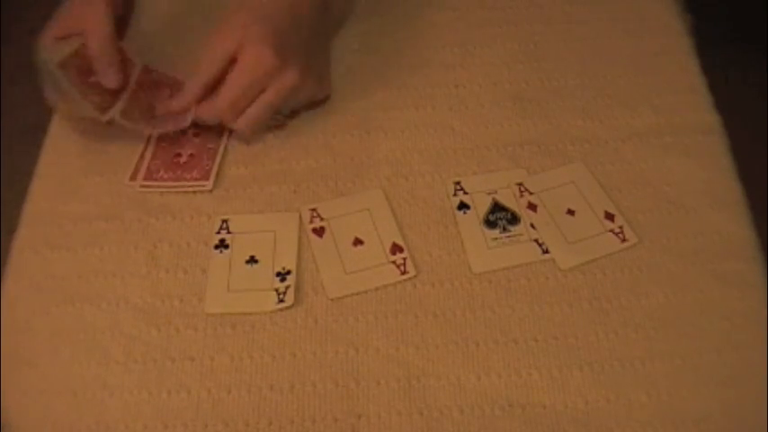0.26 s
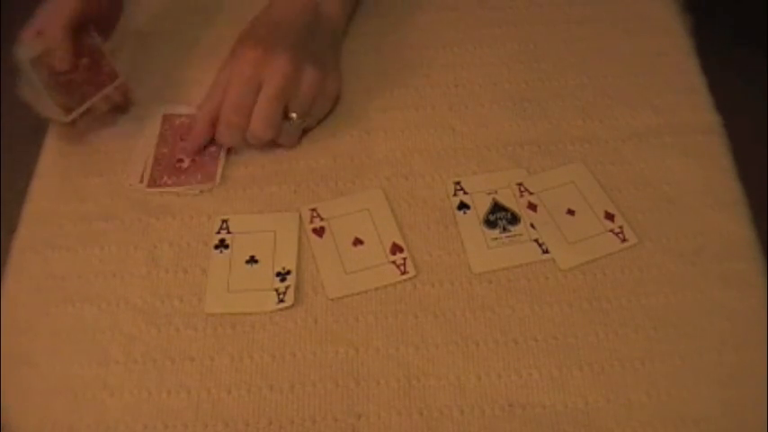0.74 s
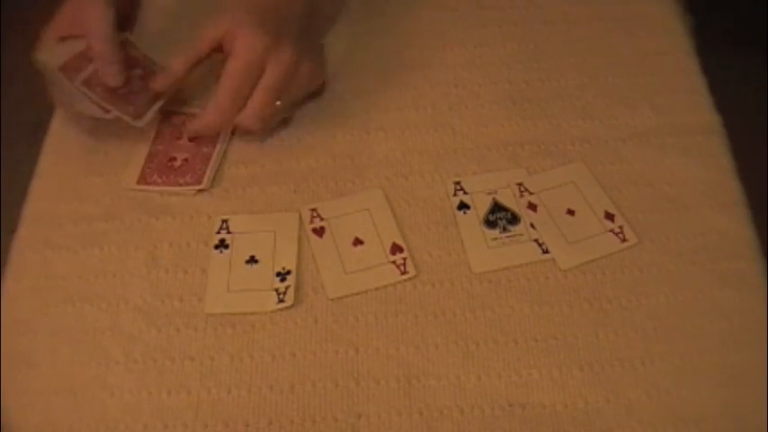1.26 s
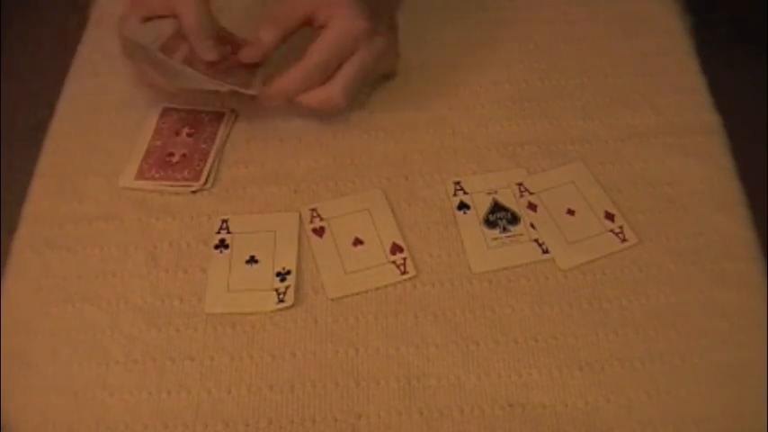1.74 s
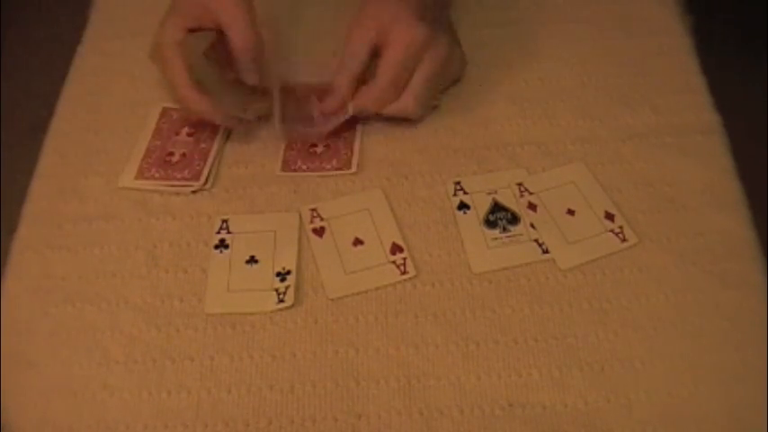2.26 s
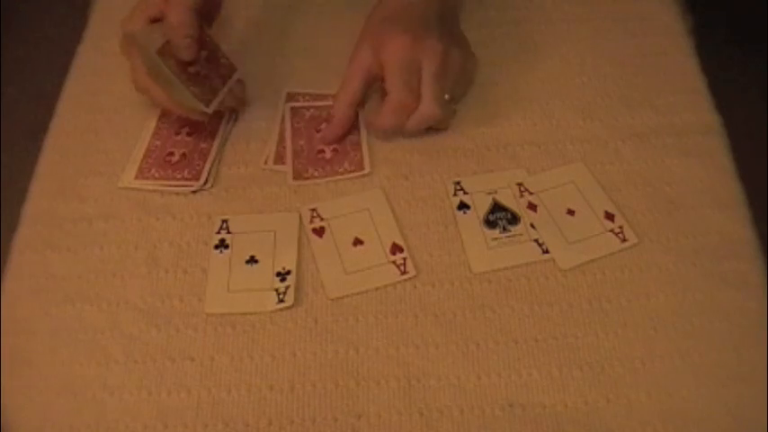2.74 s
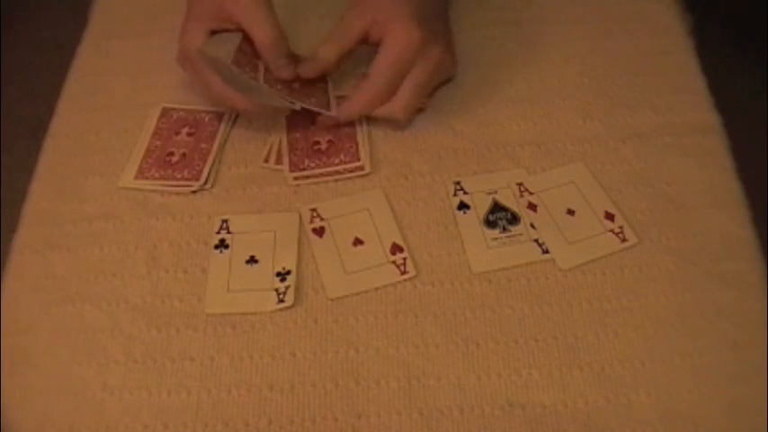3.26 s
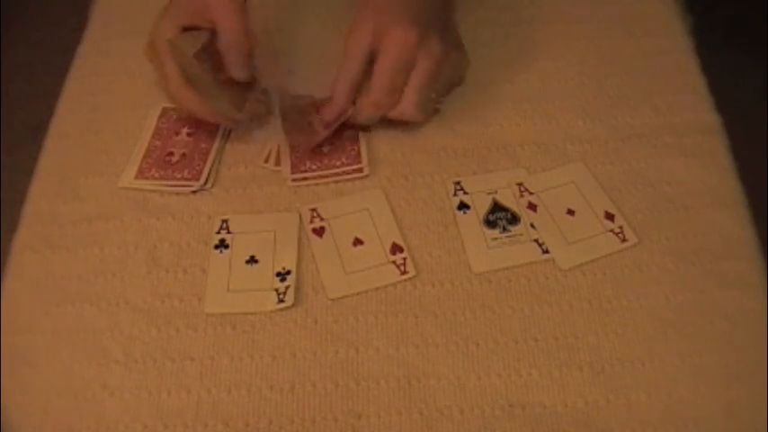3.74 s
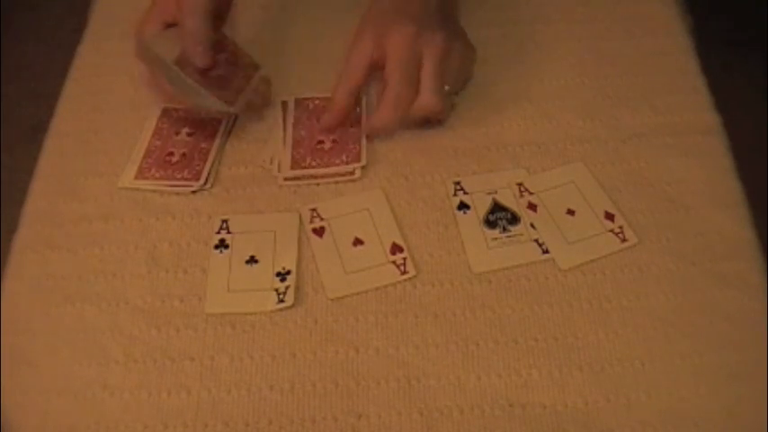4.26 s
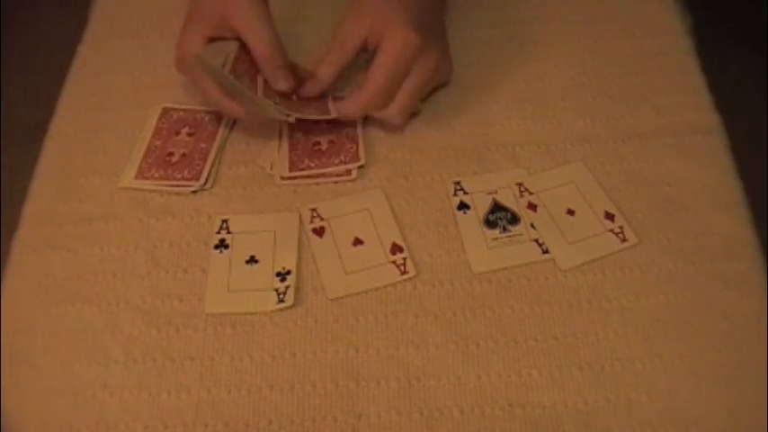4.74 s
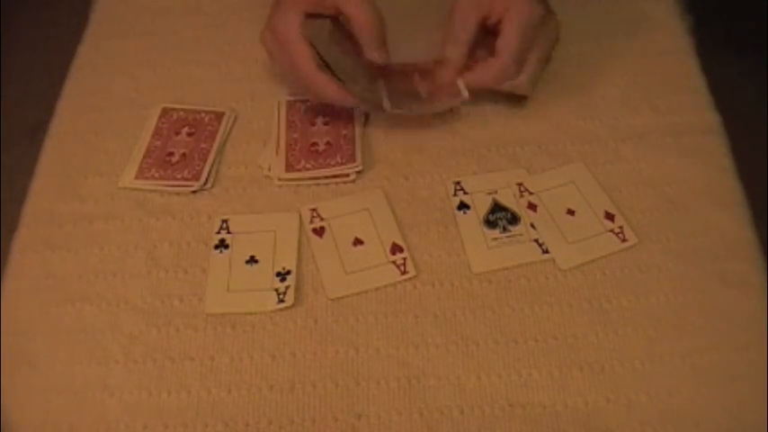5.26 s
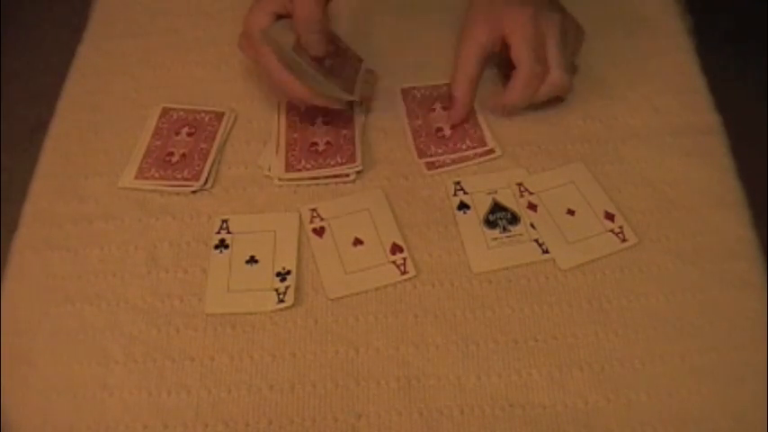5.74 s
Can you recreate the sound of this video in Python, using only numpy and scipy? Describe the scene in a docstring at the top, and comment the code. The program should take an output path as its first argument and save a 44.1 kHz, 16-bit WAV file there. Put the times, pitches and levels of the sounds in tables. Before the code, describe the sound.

In a small quiet room, steady card dealing: a brief slide, papery snap and light cushioned tap, repeated nearly three times a second over faint hiss.

```python
"""In a small quiet room, cards are dealt one by one onto piles on a cloth-covered table.
Each deal: the thumb catches a card, it hisses across the deck, snaps free and lands with a pat that thuds the table.
Pats, snaps and knocks are bursts of tiny blows ringing damped modes; slides, flapping and rustling hands
are gritty noise through such modes. The room rings briefly over steady microphone hiss."""
import sys
import numpy as np
from scipy import signal
from scipy.fft import rfft, irfft, next_fast_len
from scipy.io import wavfile
from scipy.ndimage import uniform_filter1d

SR = 44100
rng = np.random.default_rng(int(sys.argv[2]) if len(sys.argv) > 2 else 0)


def gain_from_db(level_db):
    """Turn a decibel level (scalar or array-like) into a linear amplitude factor."""
    decades = np.asarray(level_db, float) / 20
    return 10 ** decades


def wav_record(signal):
    """Record a signal, one row per channel, as 16-bit PCM in the file named by sys.argv[1]."""
    frames = np.transpose(np.atleast_2d(signal))
    bounded = np.clip(frames, -1, 1)
    # unit amplitude maps onto the largest positive 16-bit level
    quanta = np.round(bounded * 32767).astype(np.int16)
    wavfile.write(sys.argv[1], SR, quanta)


N = 265041  # samples

# Resonances, each table: mode_hz, width_hz (both before the stretch in modes), relative level_db
# bending of a card whose pitch is 800 Hz
FLEX_MODES = [(572, 343, -4.5), (800, 260, 0.5), (1122, 432, -6.5)]
# card edge and deck
EDGE_MODES = [(1805, 400, -2), (2358, 300, 2), (3202, 430, -4)]
# hard coating of the card
CRACK_MODES = [(4925, 1200, 0.5), (7410, 1400, -1.5)]
# finest grit of the card face
SHEEN_MODES = [(8530, 2500, 0), (12930, 4300, 3.5), (14200, 2840, 4.5)]
# table top
TABLE_MODES = [(218.5, 28, -2.5), (304, 75, -5), (615.5, 24, -10)]

# Events; levels are those ahead of each layer's own offsets, swells and scatter
# a card sliding off the deck: start_s, end_s, place of the peak (0-1), hiss_db, scrape_db
SLIDES = [(0, 0.021, 0.03, -41, -46.5), (0.339, 0.395, 0.25, -48, -47.5), (0.716, 0.763, 0.76, -42, -44),
          (1.105, 1.144, 0.95, -39.5, -46), (1.467, 1.514, 0.8, -41.5, -46), (1.949, 2.003, 0.8, -48, -42),
          (2.33, 2.378, 0.56, -45, -41), (2.692, 2.754, 0.55, -49.5, -45.5),
          (3.056, 3.136, 0.26, -49, -48.5), (3.417, 3.468, 0.66, -51.5, -49.5),
          (3.782, 3.85, 0.47, -49.5, -47.5), (4.137, 4.184, 0.83, -45.5, -45.5),
          (4.504, 4.545, 0.92, -45.5, -45.5), (4.857, 4.912, 0.44, -46.5, -46.5),
          (5.297, 5.352, .95, -50, -39.5), (5.675, 5.724, 0.9, -52.5, -43.5)]
# the bent card snaps free of the deck: time_s, flex_db, edge_db, crack_db, flex_pitch_hz, contact_ms
SNAPS = [(0.042, -24, -32, -35, 820, 3.6), (0.415, -29, -35.5, -44, 905, 3.1),
         (0.78, -25, -33.5, -34, 736, 2), (1.1613, -31.5, -44, -37.5, 836, 2.06),
         (1.5283, -39.5, -56, -42, 676, 6), (2.0165, -23, -26, -49, 880, 2.2),
         (2.3902, -35, -37, -45, 690, 3.9), (2.7567, -22.5, -30, -39.5, 876, 5),
         (3.1185, -23, -27.5, -28.5, 800, 3.9), (3.4863, -29.5, -27, -36, 650, 2.05),
         (3.8503, -29, -32, -37, 870, 3.3), (4.2117, -29, -23, -45, 950, 2.2),
         (4.5625, -25.5, -29.5, -30.5, 830, 4.9), (4.9165, -20.5, -31.5, -32.5, 800, 0.6),
         (5.3772, -26.5, -30.5, -64, 1020, 3.6), (5.749, -30, -28, -63, 770, 1.54)]
# it swings back against the fingers: time_s, flex_db, flex_pitch_hz
REBOUNDS = [(0.0537, -36, 610), (0.43, -37, 710), (0.7953, -35.5, 590), (1.1742, -38.5, 740),
            (1.546, -37, 680), (2.029, -38.5, 690), (2.4152, -37, 765), (2.7698, -46, 940),
            (3.143, -55, 780), (3.4965, -36, 577), (3.865, -41, 700), (4.2243, -32.5, 1220),
            (4.5727, -32.5, 690), (4.9269, -44, 640), (5.3906, -45, 880), (5.7562, -41, 780)]
# it lands edge first, then pats flat and thuds the table: time_s, flex_db, edge_db, crack_db, thud_db, contact_ms
LANDINGS = [(0.087, -32, -35.5, -32.5, -39, 2.6), (0.465, -30, -31.5, -31.5, -40.5, 1.6),
            (0.8391, -31.5, -30, -35.5, -41.5, 0.56), (1.241, -37, -40, -41.5, -45, 1.6),
            (1.5778, -29.5, -38, -28.5, -37, 2.2), (2.0875, -28, -37.5, -42.5, -34.5, 2.16),
            (2.4586, -31, -31, -38, -35, 1.09), (2.815, -32.5, -32.5, -40.5, -35, 4.5),
            (3.1966, -35.5, -32, -35.5, -40, 2.55), (3.541, -31.5, -32, -33, -38, 2.14),
            (3.903, -32, -31, -30.5, -43, .45), (4.2743, -33.5, -43, -42.5, -37.5, 2.4),
            (4.6327, -43.5, -45.5, -44.5, -50, 2.74), (4.9592, -37, -36, -35.5, -41.5, 1.4),
            (5.4134, -26, -24.5, -36, -29.5, 4.5), (5.8046, -29, -32.5, -39.5, -39, 1.5)]
# hands knock the cloth while they shift to the next pile: time_s, flex_db, edge_db
KNOCKS = [(1.801, -31, -61), (1.8261, -33.5, -65), (1.859, -34.5, -72), (1.897, -41, -61),
          (1.9454, -42.5, -60), (2.0727, -39, -59), (2.1061, -39, -45), (2.1516, -37.5, -54),
          (5.1473, -41.5, -56), (5.18, -39.5, -52), (5.206, -33, -48), (5.214, -46, -43),
          (5.2293, -37.5, -49), (5.2416, -38.5, -51), (5.284, -35, -48), (5.4719, -37.5, -51),
          (5.4827, -38.5, -41)]


def modes(table, size, stretch=0.97):
    """Complex response of damped resonances on the bins of a transform, dark far above the highest."""
    f = np.arange(size // 2 + 1) * SR / size / stretch
    total = 0
    for k, (hz, width, db) in enumerate(table):
        resonance = 1j * f * width / (hz ** 2 - f ** 2 + 1j * f * width)
        total = total + (-1) ** k * gain_from_db(db) * resonance  # signs alternate from mode to mode
    skirt = 1 / (1 + 1j * f / (2.1 * table[-1][0])) ** 2
    return skirt * total


def ring(x, table):
    """A long signal through resonances, brought to rms 1."""
    size = next_fast_len(len(x))
    y = irfft(rfft(x, size) * modes(table, size), size)[:len(x)]
    return y / np.sqrt(np.mean(y ** 2))


def grit(rough_db):
    """Noise whose samples have scattered sizes, like fibres catching."""
    return rng.standard_normal(N) * gain_from_db(rough_db * rng.exponential(size=N))


def walk(rate):
    """Random levels held 1 / rate s and slewed twice; spread near 1."""
    hold = int(SR / rate)
    steps = np.repeat(rng.standard_normal(N // hold + 1), hold)
    return 1.07 * uniform_filter1d(uniform_filter1d(steps, hold), hold)[:N]


def strike(time_s, level_db, push, table, stretch):
    """One push per row rings the modes; each ring has its loudest moment at its time and level."""
    size = 8192  # samples per ring
    y = irfft(rfft(push, size) * modes(table, size, stretch), size)
    power = uniform_filter1d(y ** 2, size=55)
    gain = gain_from_db(level_db) / np.sqrt(power.max(axis=1))
    starts = (time_s * SR).astype(int) - power.argmax(axis=1) + size
    out = np.zeros(N + 2 * size)
    for start, row in zip(starts, y * gain[:, None]):
        out[start:start + size] += row
    return out[size:size + N]


def slides():
    """Card on card: a scratchy hiss that swells with speed and stops as the edge clears the deck."""
    start, end, place, hiss_db, scrape_db = np.transpose(SLIDES)
    sheen_db = (hiss_db + scrape_db) / 2 - 3.5
    peak = start + np.clip(place, 0.05, 0.95) * (end - start)
    s = np.transpose([start - 0.02, start, peak, end, end + 0.0053, end + 0.012]).ravel()
    swell_db = np.array([-66, -23.5, -6, -11.5, -23, -30])
    slips_db = 3.0 * walk(300)  # shared by all three layers
    layers = [(hiss_db, CRACK_MODES), (scrape_db, FLEX_MODES[1:] + EDGE_MODES), (sheen_db, SHEEN_MODES)]
    out = 0
    for db, table in layers:
        speed = np.interp(np.arange(N) / SR, s, gain_from_db(db[:, None] + swell_db).ravel())
        out = out + speed * gain_from_db(slips_db + 0.99 * walk(150)) * ring(grit(2.7), table)
    return out


def rustle():
    """Skin and card on woven cloth: gritty noise in uneven bursts that rings card and table."""
    # both hands dragging over the cloth to the next pile, one list a shift: time_s, dull_db, bright_db
    shifts = [
        [(1.77, -86, -85), (1.854, -57.5, -72), (1.972, -53, -63), (2.018, -48.5, -56), (2.144, -58, -70),
         (2.3, -75, -87)],
        [(5.07, -68, -85), (5.17, -57, -65), (5.215, -48, -62), (5.328, -52.5, -60), (5.374, -49.5, -55),
         (5.504, -53, -63), (5.6, -59, -76), (5.75, -75, -85)],
    ]
    reach_db, rest_db = (-67, -72), (-73, -81)  # (dull, bright) reaching for a card; at rest
    rest_after_s = 0.15  # from landing to rest
    t = np.arange(N) / SR
    when, *drag_db = np.transpose(np.concatenate(shifts))
    drag = [gain_from_db(np.interp(t, when, db)) for db in drag_db]
    reach_s = np.array(SLIDES)[:, 0]
    rest_s = np.array(LANDINGS)[:, 0] + rest_after_s
    s = np.transpose([reach_s, rest_s]).ravel()
    dealing = [gain_from_db(np.interp(t, s, np.tile(pair, len(SLIDES)))) for pair in zip(reach_db, rest_db)]
    low_flex = [(0.77 * hz, width, db) for hz, width, db in FLEX_MODES]
    dull = ring(grit(3.0), low_flex) + 0.55 * ring(grit(4.0), TABLE_MODES)
    bright = ring(grit(3.32), FLEX_MODES[2:] + EDGE_MODES) * gain_from_db(5.9 * walk(120))
    bursts = gain_from_db(3 * walk(90))
    return bursts * (np.hypot(dealing[0], drag[0]) * dull + np.hypot(dealing[1], drag[1]) * bright)


def hiss():
    """Steady room air and microphone hiss: noise shaped by a smooth spectrum."""
    # spectrum of the hiss: freq_hz, relative level_db per Hz
    spectrum = [(35, -56), (60, -3), (118, -15), (212, -1), (338, -9), (842, 11.5), (2410, -2),
                (3940, -3.5), (14900, -7.5), (16000, -8)]
    hz, db = np.transpose(spectrum)
    f = np.maximum(np.arange(N // 2 + 1) * SR / N, 1)
    shape = gain_from_db(np.interp(np.log(f), np.log(hz), db))
    x = irfft(rfft(rng.standard_normal(N)) * shape, N)
    return gain_from_db(-66) * x / np.std(x)


def contact_rows():
    """All contacts: time_s, flex_db, edge_db, crack_db, flex_pitch_hz, contact_ms, sheen_db above the usual share."""
    # the thumb finds the top card, catches it and slips on it: time_s, flex_db, edge_db, crack_db, flex_pitch_hz
    catches = [(0.2885, -42, -63, -66, 810), (0.331, -36, -53, -43, 960), (0.339, -40.5, -49, -51, 1280),
               (0.346, -49, -58, -56, 970), (0.6885, -45.5, -58, -59, 840), (0.7214, -42, -65, -53, 1080),
               (1.054, -44, -65, -60, 1010), (1.061, -51, -61, -71, 630), (1.1042, -41, -55, -59, 810),
               (1.4383, -51, -69, -68, 930), (1.4588, -35, -42.5, -44, 915), (1.4785, -41.5, -46, -53, 970),
               (1.9597, -34, -43, -50, 780), (2.3105, -51, -59, -64, 1030), (2.3227, -36, -63, -49.5, 900),
               (2.3337, -41.5, -47, -56, 1040), (2.6641, -49, -63, -69, 950), (2.7051, -38, -57, -52, 1050),
               (3.0202, -46, -53, -57, 920), (3.0262, -40, -65, -72, 990), (3.0477, -50, -60, -69, 920),
               (3.0616, -40.5, -58, -61, 894), (3.3925, -47.5, -61, -67, 900),
               (3.4052, -44, -46.5, -54, 820), (3.4266, -39, -66, -66, 1020), (3.752, -51, -57, -70, 840),
               (3.7754, -51, -60, -70, 840), (3.8375, -44, -44, -60, 730), (4.052, -41.5, -76, -71, 860),
               (4.101, -52, -57, -70, 900), (4.1245, -49, -57, -60, 830), (4.1485, -38, -47, -52, 1020),
               (4.1872, -44.5, -43, -51, 980), (4.4724, -49.5, -49.5, -59, 820),
               (4.5039, -41, -52, -60, 980), (4.8056, -50, -72, -74, 945), (4.8385, -43, -47, -48, 730),
               (4.8552, -43, -51, -60, 870), (4.895, -49, -39, -42, 830), (5.3088, -42, -46, -57, 940),
               (5.6253, -43.5, -77, -74, 987), (5.6651, -41, -60, -59, 862), (5.6782, -39.5, -53, -63, 943),
               (5.9902, -51, -50, -63, 1040)]
    # a corner of the card flicks past the rim of the deck just before the snap: time_s, crack_db
    flicks = [(0.034, -38), (0.404, -39.5), (0.7743, -39), (1.1568, -35), (1.522, -41), (2.7502, -46),
              (3.1121, -40), (3.4792, -44), (3.8439, -49), (4.202, -39.5), (4.5526, -37), (4.911, -35.5),
              (5.3647, -48), (5.7377, -44.5)]
    # the fingertips peel off the laid card: time_s, crack_db
    releases = [(0.1413, -61), (0.5238, -58), (0.8924, -59), (1.2777, -56), (1.6451, -57), (2.8787, -59),
                (3.2272, -50.5), (3.603, -53), (3.965, -52.5), (4.322, -58), (4.672, -57.5),
                (5.0195, -55.5), (5.858, -58)]
    pat_after_s = 0.0045  # from the edge landing to the flat pat
    rows = [(s, flex, edge, crack, hz, 1.4, -1.5) for s, flex, edge, crack, hz in catches]
    rows += [(s, db - 7.5, db - 4, db, 900, 1.1, -8) for s, db in flicks]
    rows += [(*row, 1.5) for row in SNAPS]
    rows += [(s, db, db - 6.5, db - 14.5, hz, 1.8, -3) for s, db, hz in REBOUNDS]
    for s, flex, edge, crack, _, ms in LANDINGS:
        rows.append((s, flex - 4, edge, crack, 780, ms, 1.5))
        rows.append((s + pat_after_s, flex, edge - 9, crack - 8, 760, 1.3 * ms, -2))
    rows += [(s, db + 0.5, db - 4, db, 900, 0.9, 3) for s, db in releases]
    rows += [(s, flex, edge, edge - 14, 610, 2.2, -1.5) for s, flex, edge in KNOCKS]
    return rows


def contacts():
    """Every contact is a short burst of tiny uneven blows; the modes shift a little at random from contact to contact."""
    # longer, quiet rings of the table top under every contact:
    # mode_hz, width_hz (both before the stretch), relative level_db
    table_ring_modes = [(610, 13, -4), (1050, 66, -6.5), (1439, 47, -11.5)]
    pitch_scatter, length_scatter = 0.03, 0.15  # spreads of the natural log
    s, flex_db, edge_db, crack_db, flex_hz, ms, extra_db = np.transpose(contact_rows())
    count = len(s)
    shift = np.exp(0.071 * rng.standard_normal((count, 1)))
    sizes_db = 3.0 * np.abs(rng.standard_normal((count, 1024)))
    blows = rng.standard_normal((count, 1024)) * gain_from_db(sizes_db)
    t = (np.arange(1024) - 352) / SR  # the main blow falls at 0
    flex_hz = flex_hz * np.exp(pitch_scatter * rng.standard_normal(count))
    ms = np.clip(ms * np.exp(length_scatter * rng.standard_normal(count)), 0.1, 20)
    length_s = ms[:, None] / 1000

    def burst(share, lead_db, lead_s, main=0.0):
        """Squeezed air and brushing fibres swell first, a main blow falls, then the small blows die away."""
        lead = gain_from_db(lead_db) * np.exp(t / lead_s) + np.exp(t / 0.0003)
        decay = np.exp(-np.abs(t) / (share * length_s))
        return main * (t == 0) + blows * np.where(t < 0, lead, decay)

    # harder blows reach higher
    sheen_db = crack_db + extra_db - 8.0 + 0.12 * (crack_db + 48.0)
    bending = burst(0.9, -np.inf, 1, 7.0)  # no slow lead: the card bends only once it is hit
    flex = strike(s, flex_db, bending, FLEX_MODES, flex_hz[:, None] / 800)
    table_ring = strike(s, flex_db - 13.0, bending, table_ring_modes, 0.97)
    edge = strike(s, edge_db, burst(0.9, -17.0, 0.0034, 3.0), EDGE_MODES, shift)
    crack = strike(s, crack_db, burst(0.6, -8.5, 0.002), CRACK_MODES, shift)
    sheen = strike(s, sheen_db, burst(0.51, -6.0, 0.0019), SHEEN_MODES, shift)
    return flex + table_ring + edge + crack + sheen


def carries():
    """Uneven flapping from the snap to the landing, rising again as air is trapped under the card."""
    # the freed card on its way to the pile, one row a deal, before the swell: dull_db, bright_db
    flapping = [(-38.5, -46.5), (-47, -48), (-42, -50.5), (-45, -57), (-44.5, -49.5), (-38.5, -55),
                (-42.5, -50.5), (-50, -47), (-49.5, -47.5), (-41.5, -47), (-44, -55), (-47, -48.5),
                (-55, -50), (-49, -50), (-44, -53), (-42.5, -49)]
    start, end = np.array(SNAPS)[:, 0], np.array(LANDINGS)[:, 0]
    s = np.transpose([start - 0.003, start, (start + end) / 2, end, end + 0.0044]).ravel()
    swell_db = np.array([-28, 4.5, -13.5, -3.0, -43.5])
    flaps_db = 3 * walk(160)  # shared by both layers
    bright_modes = EDGE_MODES + [(5400, 8400, -9.5)]
    out = 0
    for db, table in zip(np.transpose(flapping), (FLEX_MODES, bright_modes)):
        level_db = np.interp(np.arange(N) / SR, s, (db[:, None] + swell_db).ravel())
        out = out + gain_from_db(level_db + flaps_db + 0.42 * walk(120)) * ring(grit(2.6), table)
    return out


def thud_rows():
    """Pushes on the table top as time_s, level_db: snaps, rebounds, landings and knocks all jolt it."""
    thud_after_s = 0.0071  # from the edge landing to the thud
    rows = [(s, flex - 24) for s, flex, *_ in SNAPS]
    rows += [(s + 0.0032, db - 7.5) for s, db, _ in REBOUNDS]
    rows += [(s + thud_after_s, thud) for s, _, _, _, thud, _ in LANDINGS]
    rows += [(s + 0.0039, flex - 13) for s, flex, _ in KNOCKS]
    return rows


def thuds():
    """The cloth softens each push on the table to a smooth shove; the boom returns between the walls a few times."""
    s, db = np.transpose(thud_rows())
    soft_s = 0.0011 * np.exp(0.17 * rng.standard_normal((len(s), 1)))
    t = np.arange(7000) / SR

    def shove(late_s):
        """A push that rises and dies smoothly, starting late_s after the blow."""
        since = np.clip(t - late_s, 0, 1)
        return since * np.exp(-since / soft_s)

    push = shove(0)
    for k in range(1, 4):
        push = push + gain_from_db(-7.5 - 7.5 * k) * shove(0.045 * k)
    return strike(s, db, push, TABLE_MODES, 0.96)


def room(x):
    """Diffuse echoes of a small furnished room: bands of noise, each dying at its own rate."""
    # echo bands: centre_hz (before the stretch in modes), t60_s, level_db against the direct sound
    echo_bands = [(232, 0.24, -10.5), (700, 0.26, -14.5), (2070, 0.33, -13), (4770, 0.26, -18.5),
                  (12100, 0.19, -21.5)]
    t = np.arange(SR // 2) / SR
    tail = 0
    for hz, t60, db in echo_bands:
        width = 2.32 * hz
        noise = ring(rng.standard_normal(len(t)), [(hz, width, 0)])
        band = noise * gain_from_db(-60 * t / t60) * np.clip(t / 0.0012, 0, 1)
        # energy set so that the echoes near hz stand at db against the direct sound
        tail = tail + gain_from_db(db) * band * np.sqrt(np.pi * width / SR / np.sum(band ** 2))
    return x + signal.fftconvolve(x, tail)[:N]


def scene():
    """Cards and hands in the room, over the hiss."""
    cards_and_hands = slides() + rustle() + contacts() + carries() + thuds()
    return (room(cards_and_hands) + hiss())[None]


def top_cut(x):
    """Nothing passes above the cut-off."""
    return signal.sosfilt(signal.butter(12, 16820, fs=SR, output="sos"), x)


def record(dry):
    """The small microphone loses the deep bass and the very top."""
    low_cut_hz, top_hz = 90.5, 15950
    x = signal.sosfilt(signal.butter(4, low_cut_hz, "high", fs=SR, output="sos"), dry)
    x = signal.sosfilt(signal.ellip(6, 0.5, 40, top_hz, fs=SR, output="sos"), x)
    return top_cut(x)


dry = scene()
out = record(dry)
wav_record(out)
```